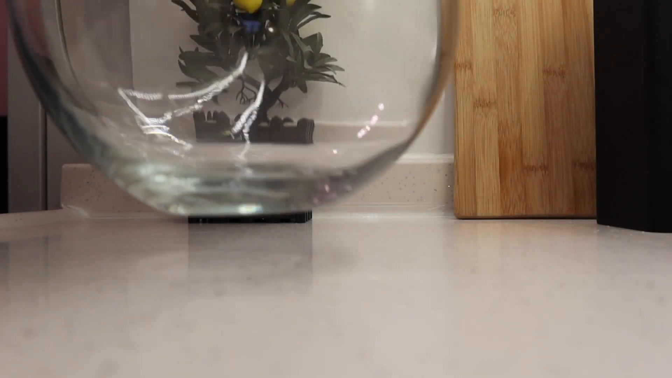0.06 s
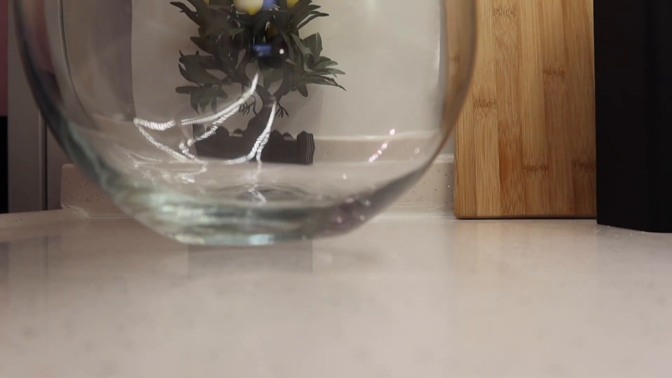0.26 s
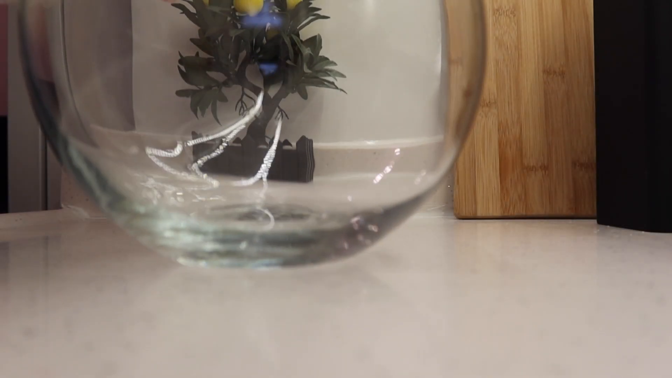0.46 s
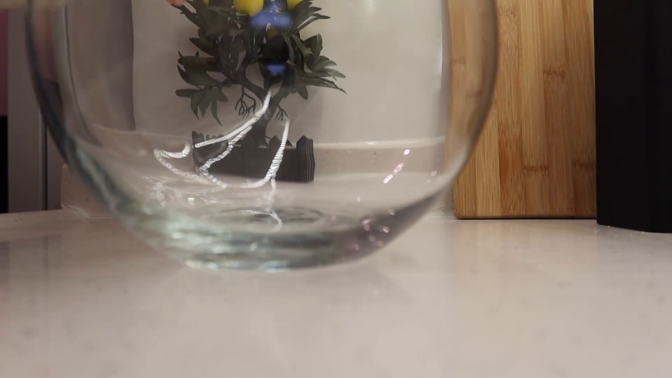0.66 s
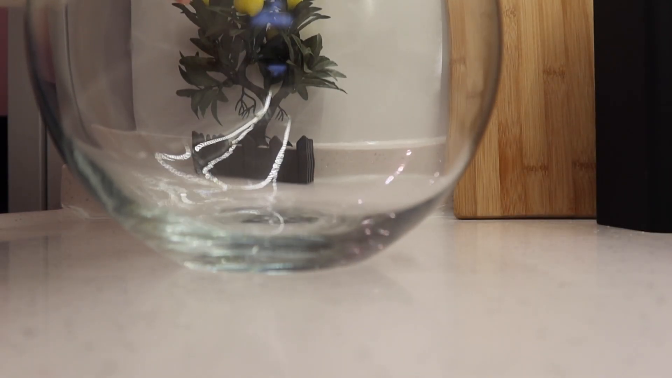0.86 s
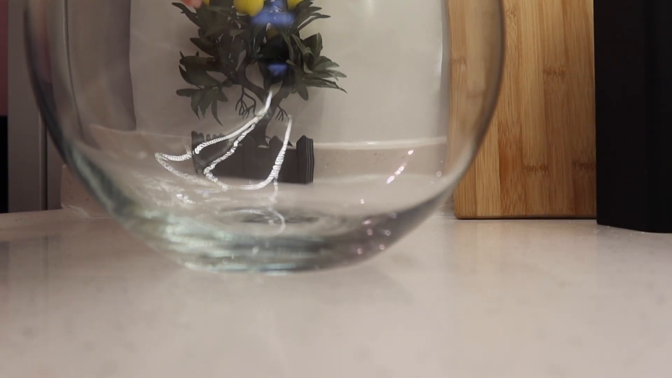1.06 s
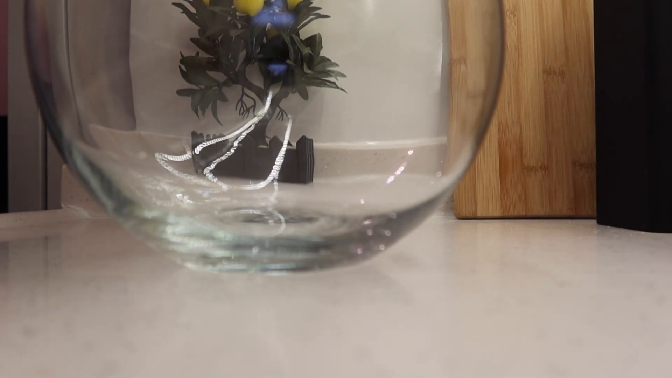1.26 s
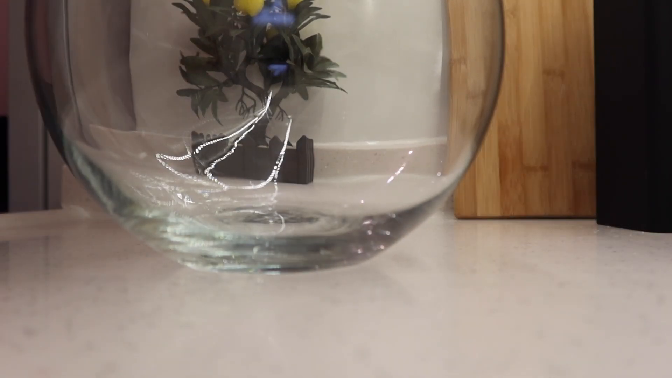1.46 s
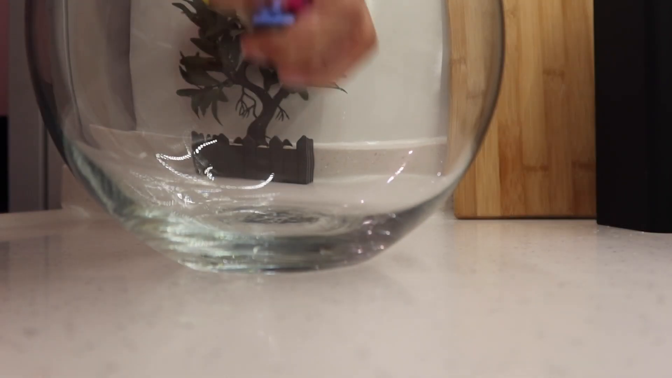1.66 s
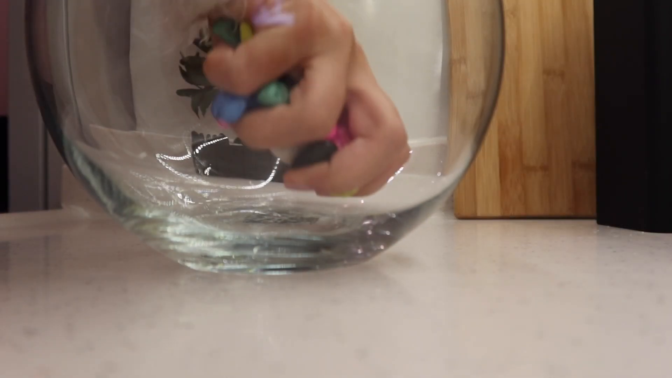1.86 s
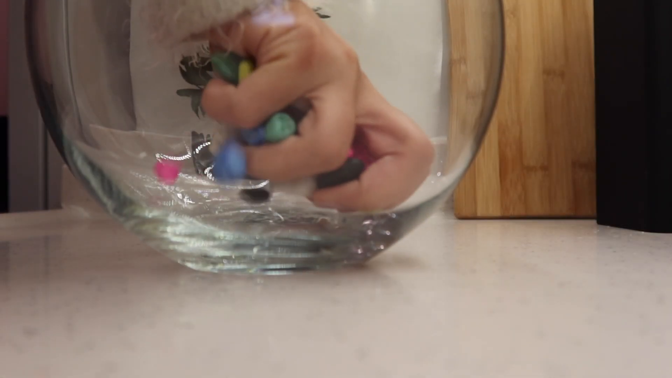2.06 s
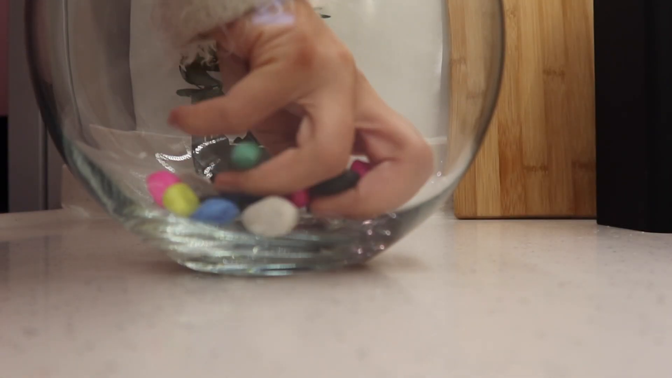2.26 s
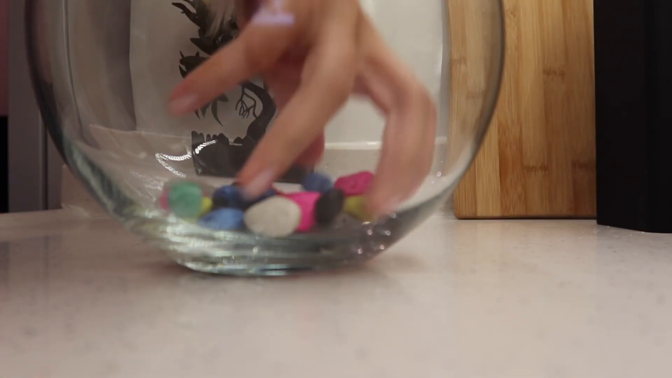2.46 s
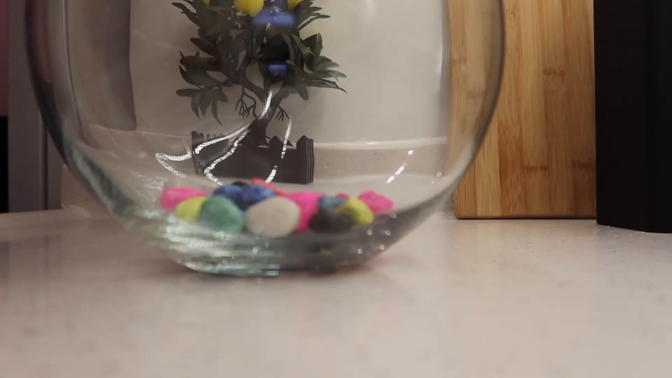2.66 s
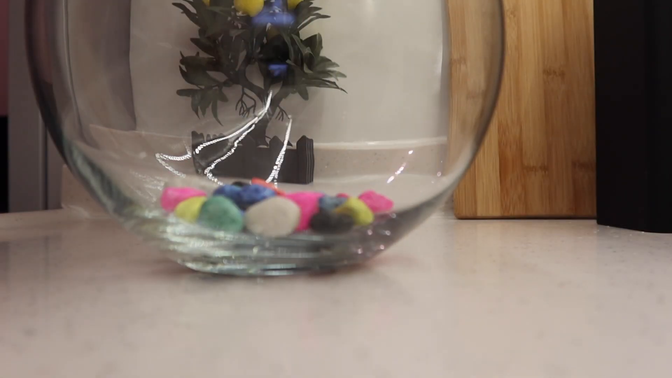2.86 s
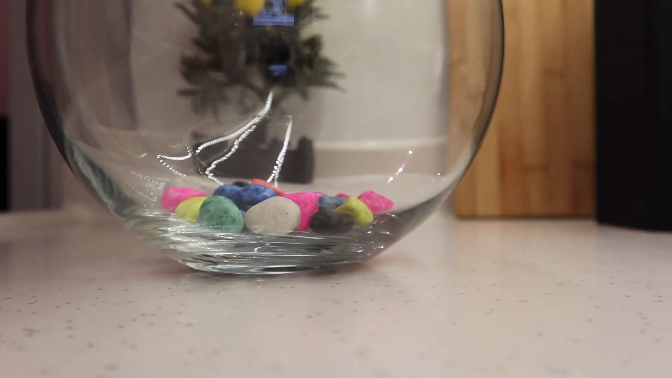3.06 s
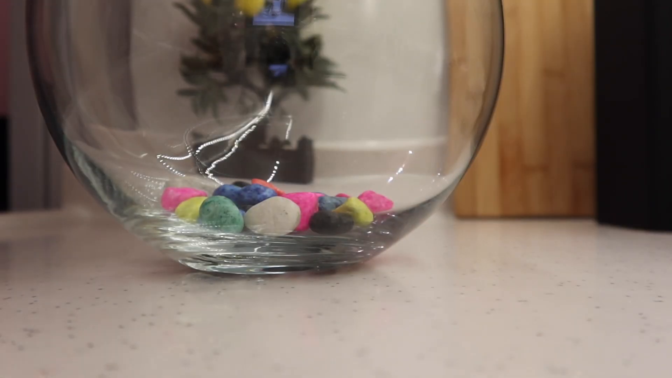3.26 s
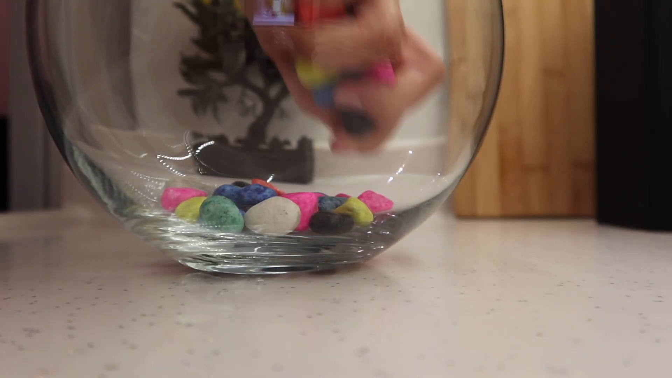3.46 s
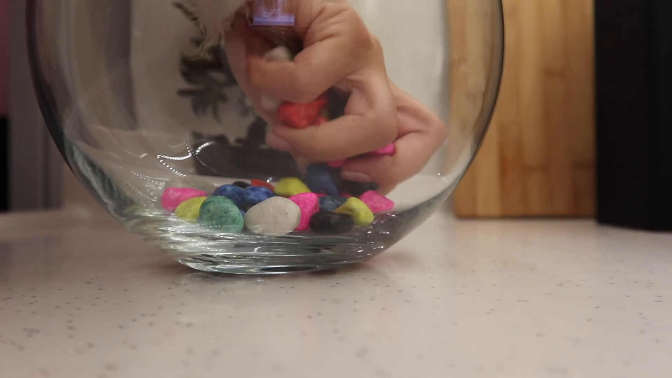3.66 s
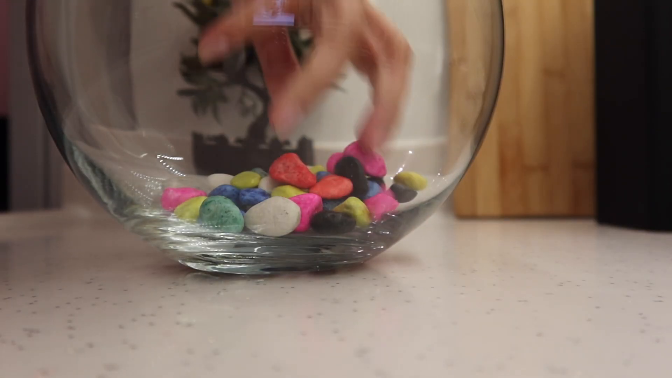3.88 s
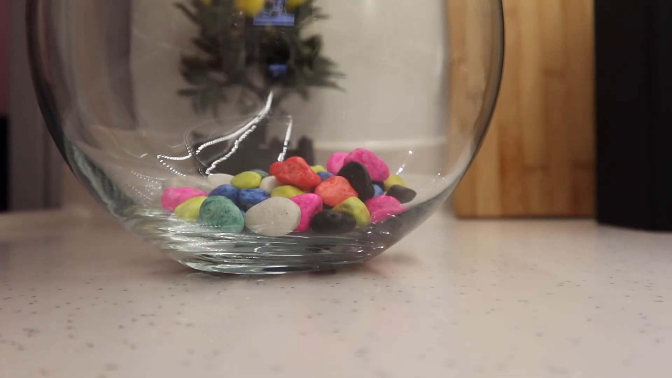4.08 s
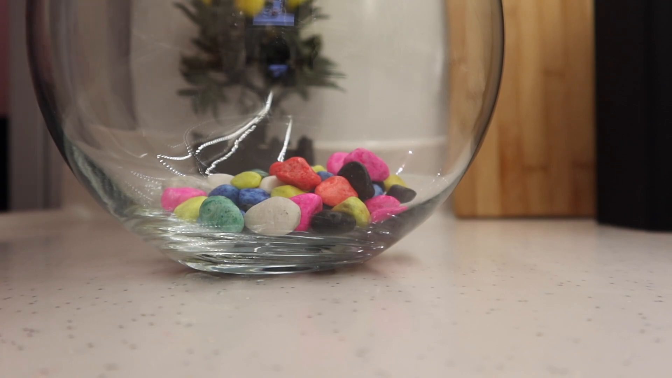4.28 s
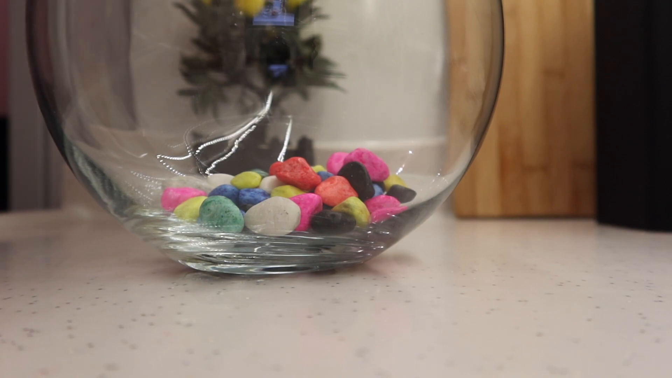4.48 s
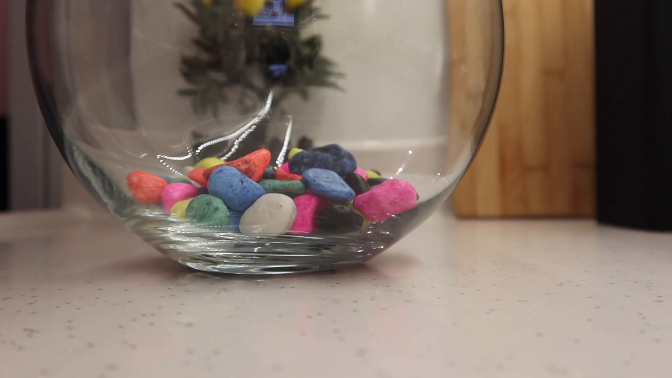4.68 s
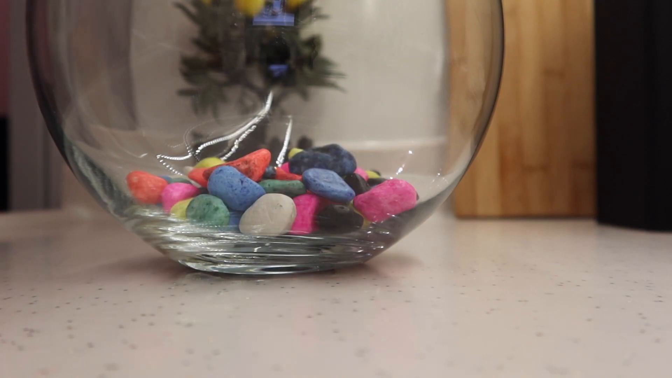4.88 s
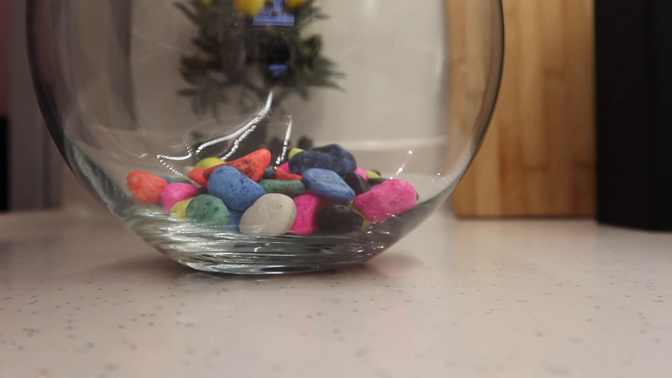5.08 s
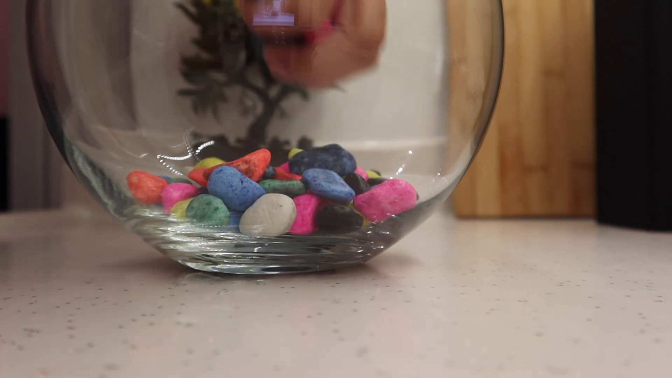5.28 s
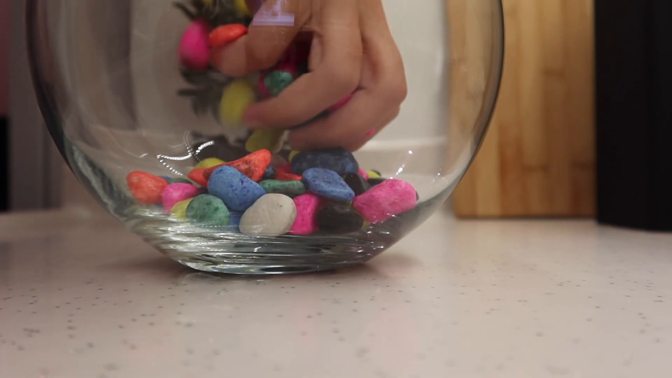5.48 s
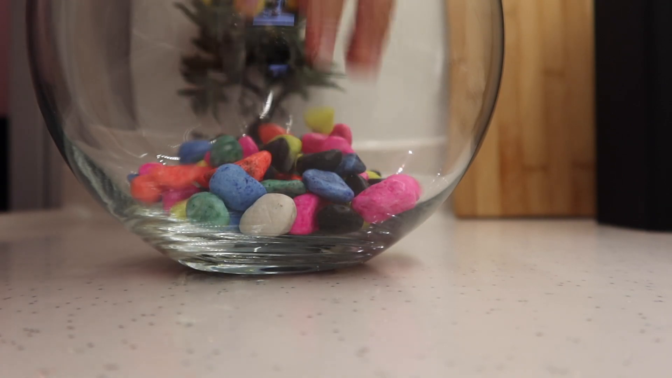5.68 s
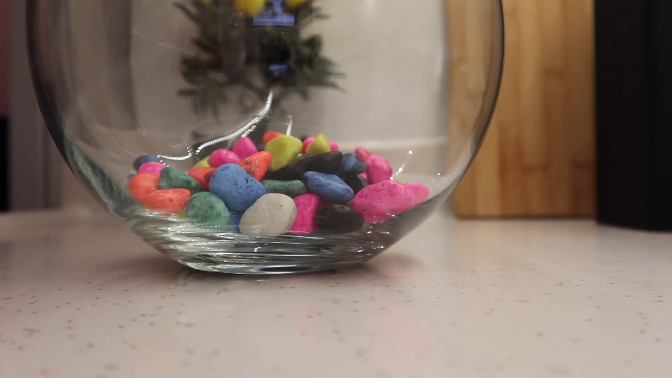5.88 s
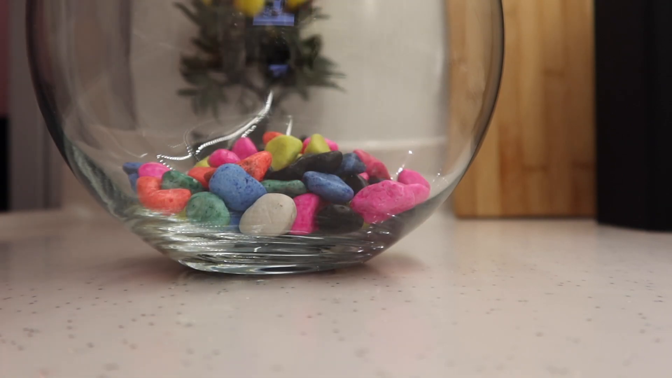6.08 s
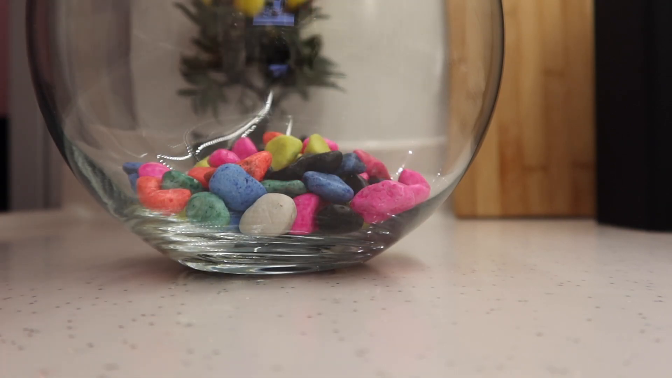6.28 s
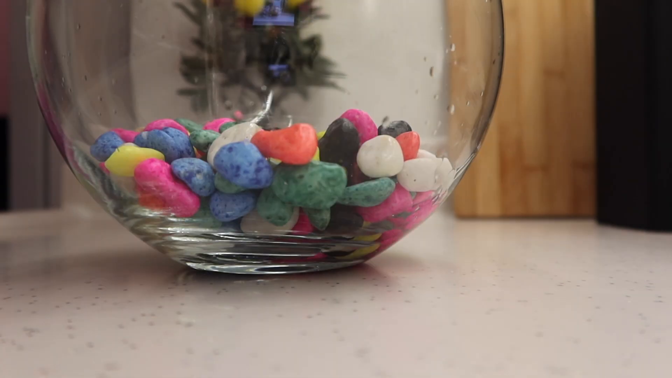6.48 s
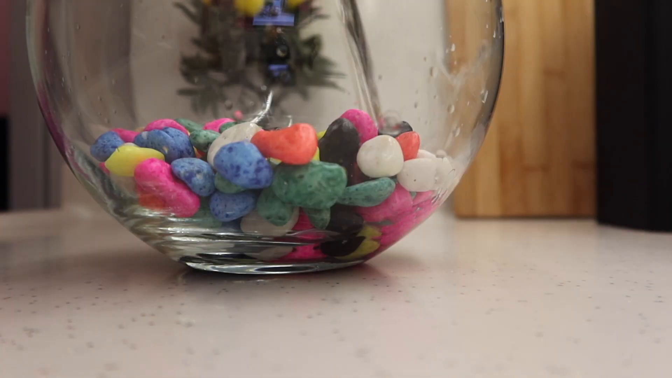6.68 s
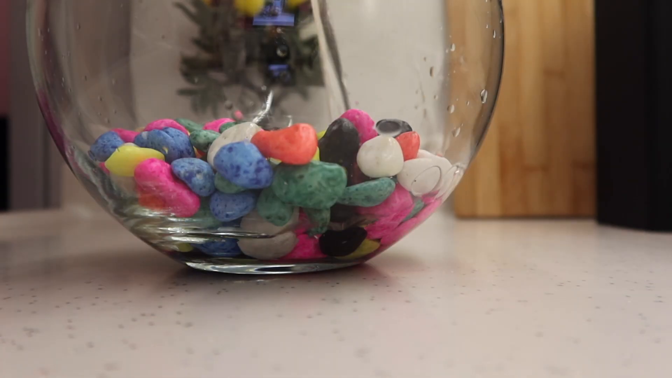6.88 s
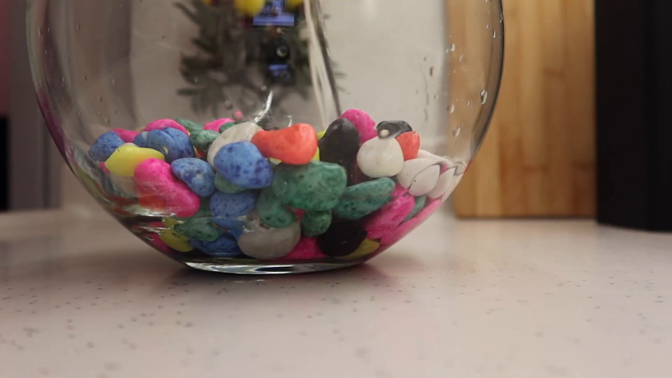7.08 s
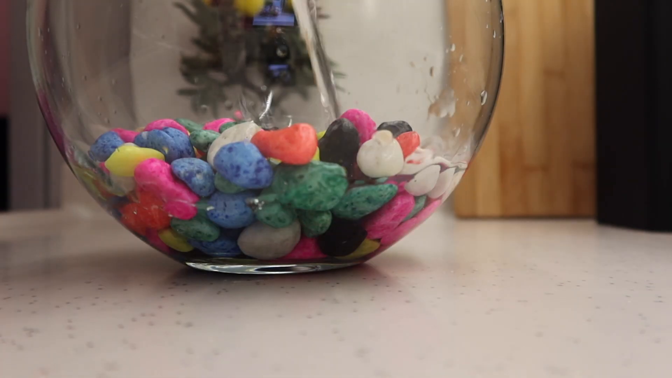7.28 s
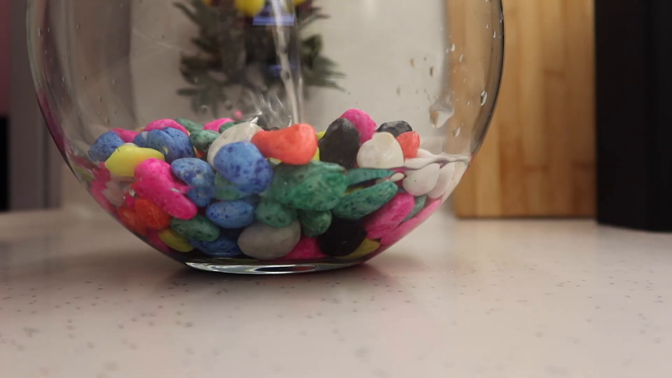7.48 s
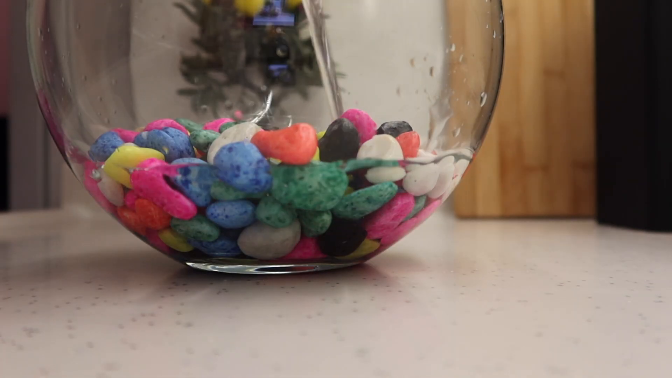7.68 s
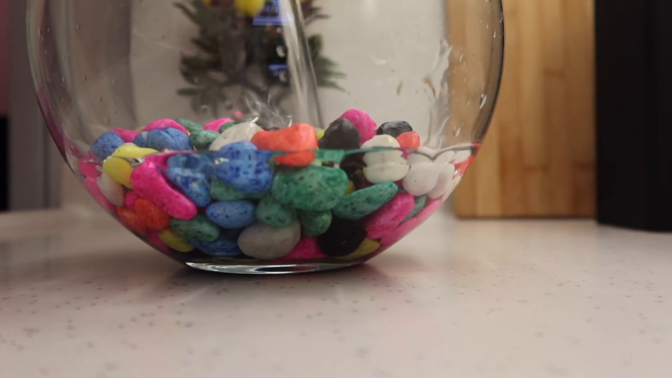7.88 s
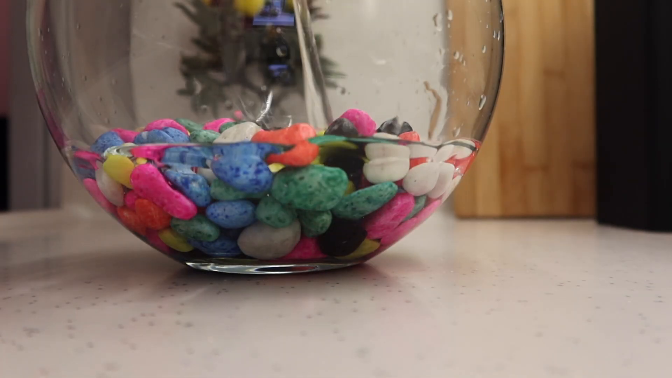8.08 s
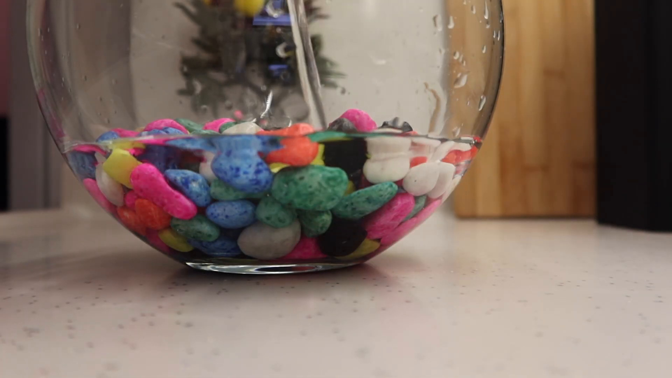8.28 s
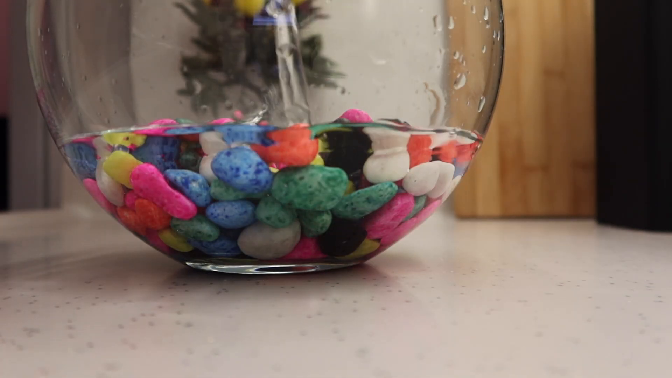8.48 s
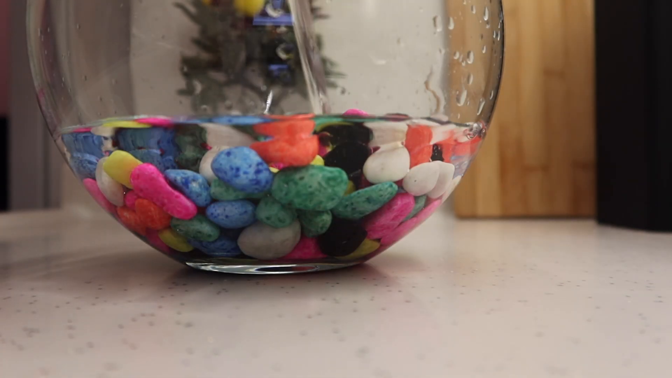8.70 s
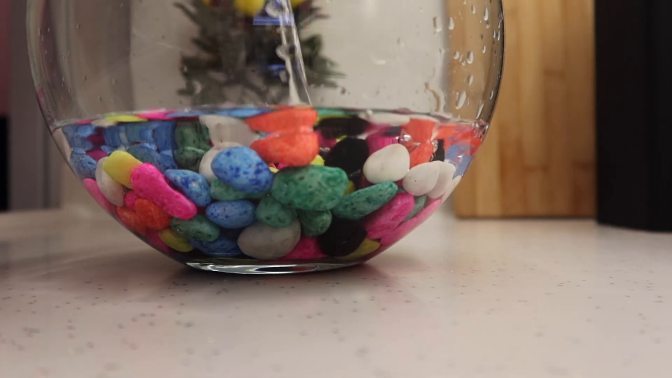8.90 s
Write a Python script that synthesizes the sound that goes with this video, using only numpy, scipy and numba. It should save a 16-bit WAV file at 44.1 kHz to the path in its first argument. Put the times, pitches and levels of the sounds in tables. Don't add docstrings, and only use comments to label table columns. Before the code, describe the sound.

Low appliance hum, then a heavy glass foot knocks twice on the counter and settles. Pebbles drop in three short, loud bursts, each a dense high clinking rattle with gritty scraping and a faint rim ring; the hum sinks beneath them. Finally water gushes over the stones, gurgling and pinging inside the bowl. Close phone microphone, small room, slightly limited peaks.

```python
import sys
import numpy as np
from scipy import signal
from scipy.fft import rfft, irfft
from scipy.io import wavfile
from scipy.ndimage import uniform_filter1d
from numba import njit

SR = 44100
rng = np.random.default_rng(int(sys.argv[2]) if len(sys.argv) > 2 else 0)


def dump(signal):
    limited = np.clip(np.atleast_2d(signal).T, -1, 1)
    pcm = np.round(limited * 32767).astype(np.int16)
    wavfile.write(sys.argv[1], SR, pcm)


def volts_from_db(level):
    exponent = np.asarray(level, float) / 20
    return 10 ** exponent


N = 394254
T = np.arange(N) / SR
DUST = 1e-12 * rng.standard_normal(N)
OPPOSED = np.array([[1], [-1]])

CUTS = [
    3.08,
    4.605,
    6.358,
]
# full from in seconds,
# full to in seconds, ring level in dB, thud in dB re ring, rim level in dB, rim loss in dB per second.
RATTLE = [
    (2.247, 2.49, -24.5, -4.5, 1, 1.5),
    (3.767, 3.917, -33, -0.5, 4, 13),
    (5.576, 5.765, -32, -7.5, 5.5, -7),
]
RATTLE_RISE_DB_PER_S, RATTLE_FALL_DB_PER_S = 171, 149.5
# time in seconds, peak level in dB, pitch in Hz.
DROPS = [(6.3656, -23.5, 2470), (6.3802, -13.5, 5170), (6.4238, -23, 2270), (6.4567, -21.5, 2220),
         (6.496, -26.5, 2150), (6.5532, -34, 2750), (6.583, -34, 2200), (6.6214, -11.5, 2240),
         (6.721, -25, 2100), (6.7394, -17.5, 2110), (6.76, -15, 2170), (6.8217, -24.5, 2760),
         (6.8992, -22, 2760), (6.9193, -19, 3240), (6.956, -20, 4740), (7.0143, -23, 2340),
         (7.0515, -15, 3510), (7.0808, -29, 2420), (7.1222, -23, 2730), (7.1343, -20, 2490),
         (7.16, -20.5, 2470), (7.1943, -20.5, 3520), (7.2522, -21, 2220), (7.2642, -18.5, 4900),
         (7.2828, -14, 4850), (7.3343, -29, 2370), (7.4236, -17.5, 2440), (7.4593, -17.5, 3130),
         (7.5022, -23.5, 3360), (7.5328, -18, 5200), (7.5662, -18.5, 2685), (7.5908, -21.5, 2470),
         (7.6534, -29, 2010), (7.6777, -26.5, 3630), (7.721, -23.5, 4260), (7.756, -23.5, 2000),
         (7.7818, -17.5, 3400), (7.836, -47, 2320), (7.855, -20.5, 4250), (7.9117, -27.5, 2920),
         (7.9501, -16, 4340), (7.9842, -26, 1984), (8.0123, -21, 3330), (8.034, -20, 3560),
         (8.0497, -23, 1980), (8.0823, -14.5, 3330), (8.1927, -18.5, 3600), (8.255, -15.5, 5200),
         (8.3516, -20.5, 3350), (8.4168, -16, 3300), (8.5183, -22.5, 3530), (8.626, -28, 4900),
         (8.6437, -21, 5220), (8.7193, -19, 3450), (8.7948, -35.5, 2530), (8.8736, -44, 2400),
         (8.8949, -19.5, 5200)]
# frequency in Hz, width in Hz, level in dB.
AIR = [(455.3, 21, 0), (1230, 28, 12.5), (1713, 49, 8), (2046, 49, 3.5), (2470, 90, 8.5), (3330, 66, -1.5),
       (3540, 68, 6), (4360, 97, 4), (5130, 41, 1.5), (5390, 160, 2), (6070, 110, 1.5), (6920, 250, -6),
       (7600, 310, -10)]


def level(x, db):
    return x * volts_from_db(db) / np.sqrt(np.mean(x ** 2))


def train(s, size):
    return np.bincount(np.clip(s * SR, 0, N - 1).astype(int), size, N)


def fade(x, t60):
    return signal.lfilter([1], [1, -np.exp(-np.log(1000) / (t60 * SR))], x + 1e-18)


def mode(x, hz, t60):
    r, w = np.exp(-np.log(1000) / (t60 * SR)), 2 * np.pi * hz / SR
    return signal.lfilter([0, r * np.sin(w)], [1, -2 * r * np.cos(w), r * r], x + 1e-18)


def band(x, lo_hz, hi_hz):
    return signal.sosfilt(signal.butter(2, [lo_hz, hi_hz], "band", fs=SR, output="sos"), x + DUST[:x.shape[-1]])


def steep(x, order, hz, side="low"):
    return signal.sosfilt(signal.butter(order, hz, side, fs=SR, output="sos"), x)


def colour(x, table):
    hz, db = np.transpose(table)
    n = 2 ** int(np.ceil(np.log2(N)))
    f = np.arange(n // 2 + 1) * SR / n + 1
    return irfft(rfft(x, n) * volts_from_db(np.interp(np.log(f), np.log(hz), db)), n)[..., :N]


def walk(rate):
    knots = rng.standard_normal(int(N * rate / SR) + 2)
    return 1.55 * np.interp(T * rate, np.arange(len(knots)), knots)


def hold(rows, rise_db, fall_db):
    below = []
    for row in rows:
        below.append(np.maximum(rise_db * (row[0] - T), 0) + np.maximum(fall_db * (T - row[1]), 0))
    below = np.array(below)
    return -below.min(axis=0), below.argmin(axis=0)


@njit
def bank(at, left, right, pole, n):
    out = np.zeros((2, n))
    for m in range(len(pole)):
        a, b, p = 0j, 0j, pole[m]
        life = int(-12 / np.log(abs(p)))
        for k in range(len(at)):
            a, b = a + left[k, m], b + right[k, m]
            until = at[k + 1] if k + 1 < len(at) else n
            for i in range(at[k], min(until, at[k] + life)):
                out[0, i] += a.imag
                out[1, i] += b.imag
                a, b = a * p, b * p
    return out


def strike(s, db, pan_db, hz, gain_db, t60, turn):
    order = np.argsort(s)
    mix = rng.standard_normal((len(s), len(hz)))
    mix *= volts_from_db(gain_db) / np.sqrt(np.mean(mix ** 2, axis=1, keepdims=True))
    phase = np.exp(1j * turn * rng.standard_normal(len(hz)))
    left = mix * volts_from_db(db + pan_db / 2)[:, None] * phase
    right = mix * volts_from_db(db - pan_db / 2)[:, None] / phase
    pole = np.exp((2j * np.pi * hz - np.log(1000) / t60) / SR)
    return bank((s[order] * SR).astype(np.int64), left[order], right[order], pole, N)


def ducking(x, top_db, release_s, depth):
    fall = np.exp(-1 / (release_s * SR))
    parts = np.split(np.mean(x ** 2, axis=0), (np.array(CUTS) * SR).astype(int))
    power = np.concatenate([signal.lfilter([1 - fall], [1, -fall], p) for p in parts])
    return (1 + power / volts_from_db(top_db) ** 2) ** -depth


def hum():
    # frequency in Hz, level in dB per Hz.
    spectrum = [(12, -33), (20, -7), (70, 0.5), (122, -0.5), (266, -6), (427, -7), (549, -9), (614, -10),
                (1160, -14.5), (1300, -11.5), (1580, -16), (2540, -17), (6250, -25), (8300, -31.5),
                (10000, -34.5), (14600, -38), (15500, -38)]
    # time in seconds, level in dB.
    swell = [
        (0, -53.5),
        (1.9, -51.5),
        (3.07, -58),
        (3.09, -51.5),
        (4.6, -53),
        (5.4, -52.5),
        (8.94, -48),
    ]
    mid, side = colour(rng.standard_normal((2, N)), spectrum)
    both = band(mid, 33, 15000) + 0.78 * band(side, 160, 16000) * OPPOSED
    wander = .6 * walk(9)
    return level(both, 0) * volts_from_db(np.interp(T, *np.transpose(swell)) + wander)


def counter():
    # time in seconds, ring level in dB, contact time in ms,
    # room level in dB, favoured frequency in Hz where the foot lands.
    knocks = [
        (.537, -3.5, 0.21, -3.5, 865),
        (.852, -9, 1.22, -22.5, 478),
        (0.896, -2, 1.23, -49, 470),
        (1.478, -23, 1.15, -47, 325),
        (1.521, -28, 1.15, -47.5, 322),
        (1.958, -24.5, 1.6, -39, 297),
        (3.784, -11, 3.4, -35, 150),
    ]
    # frequency in Hz, level in dB, t60 in seconds.
    slab = [(75.7, -13, 0.14), (131.6, -9.5, 1), (201, 1, 0.33), (319.3, 4.5, 0.16), (366, 9.5, 0.058),
            (462, 6, 0.2), (513, 5, 0.053), (617, 13, 0.025), (800, 6, 0.056), (1135, 12, 0.038),
            (1390, 16.5, 0.037), (2000, 4, 0.023), (2940, 5, 0.012)]
    # time in seconds, level in dB, t60 in seconds.
    scrapes = [
        (.537, 11.5, 0.0083),
        (0.85, -26.5, 0.014),
        (.896, -29.5, 0.029),
        (1.476, -37, 0.54),
        (4.569, -32.5, 0.12),
    ]
    # time in seconds, level in dB, t60 in seconds.
    cracks = [
        (0.539, -15, 0.0054),
        (.545, -42, .05),
        (4.566, -54.5, .1),
        (4.584, -57, .06),
    ]
    soft_hz_ms = 2630
    favour_db_per_octave = 6.5
    s, ring_db, contact_ms, room_db, favour_hz = np.transpose(knocks)
    ring, scrape, crack = np.zeros((3, N))
    for k in range(len(s)):
        after = slice(int(s[k] * SR), int((s[k] + .4) * SR))
        t = T[after] - T[after.start]
        u = np.clip(t * 1000 / contact_ms[k], 0, 1)
        push = volts_from_db(ring_db[k] - 46.5) * np.sin(np.pi * u) ** 2 / contact_ms[k]
        push = steep(push, 4, min(soft_hz_ms / contact_ms[k], SR / 3))
        ring[after] += volts_from_db(29) * contact_ms[k] ** 3 * push
        for m, (f, d, t60) in enumerate(slab):
            off_db = favour_db_per_octave * abs(np.log2(f / favour_hz[k]))
            ring[after] += (-1) ** m * volts_from_db(d - off_db) * mode(push, f, t60)
    for start, db, t60 in scrapes:
        scrape += fade(train(np.array([start]), [volts_from_db(db)]), t60)
    for start, db, t60 in cracks:
        crack += fade(train(np.array([start]), [volts_from_db(db)]), t60)
    rasp = rng.standard_normal(N)
    crack = band(crack * rasp, 3000, 13000)
    scrape = band(band(band(scrape * rasp, 340, 3000), 300, 2900), 200, 3000)
    send = band(band(train(s, volts_from_db(room_db - 3.0)), 40, 2500), 30, 2600)
    return band(ring, 46, 9000) + rocking() + crack + scrape, send


def room(x):
    # centre in Hz, t60 in seconds, level in dB.
    octaves = [(74, 0.64, -9.5), (124, 1., 4), (234.4, 0.46, 11.5), (515, 0.49, 12), (1049, 0.64, 0.5),
               (1670, 0.4, 1), (2600, 0.4, -3), (7000, 0.18, -40.5)]
    t = T[:SR]
    noise = rng.standard_normal((3, SR))
    tail = 0
    for f, t60, d in octaves:
        spread = noise[0] + min(f / 900, .4) * noise[1:]
        tail = tail + volts_from_db(d - 60 * t / t60) * band(spread, f / 2.38, f * 1.355)
    swell = 1 - .85 * np.exp(-(t / .07) ** 2)
    return signal.oaconvolve(x[None], tail * swell, axes=1)[:, :N]


def rocking():
    # tap time in seconds, peak level in dB.
    taps = [(1.1, -28), (1.162, -32), (1.216, -32.5), (1.277, -34), (1.323, -33.5), (3.959, -23),
            (3.995, -18), (4.037, -22.5), (4.068, -22), (4.105, -24), (4.141, -24), (4.171, -28),
            (4.206, -26), (4.237, -28.5), (4.269, -25.5), (4.297, -30), (4.328, -25.5), (4.36, -28.5),
            (4.383, -29), (4.409, -26.5), (4.439, -29), (4.457, -28.5), (4.49, -33), (4.508, -30.5),
            (4.529, -31), (4.551, -25.5)]
    # frequency in Hz, level in dB, t60 in seconds.
    tap_modes = [(208, 0, 0.14), (250.2, -3, 0.14), (299, -3, 0.084), (443.6, 6.5, 0.15), (89.8, -5, 0.075),
                 (127, -8, 0.12), (513, 8.5, 0.12)]
    # time in seconds, length in seconds, pitch in Hz, level in dB.
    squeaks = [
        (0.597, 0.054, 6850, -66),
        (1.114, 0.036, 2874, -62.5),
        (1.11, 0.035, 4400, -71),
    ]
    s, db = np.transpose(taps)
    mix_db = 4.0 * rng.standard_normal((len(s), len(tap_modes)))
    rock = np.zeros(N)
    for m, (f, d, t60) in enumerate(tap_modes):
        tap = uniform_filter1d(train(s, volts_from_db(db + d - 8.5 + mix_db[:, m])), size=90)
        rock += (-1) ** m * mode(tap, f, t60)
    bright = train(s[::2], volts_from_db(db[::2] - 26.0))
    rock = rock + mode(bright, 1407, 0.037) - mode(bright, 1150, 0.042) + mode(bright, 720, 0.056)
    squeak = np.zeros(N)
    for t, length, f, d in squeaks:
        squeak += volts_from_db(d + 3.4 * walk(60)) * np.exp(-((T - t) / length) ** 2) * np.sin(2 * np.pi * f * T)
    return band(rock, 70, 3000) + squeak


def landings():
    # time in seconds, peak level in dB, thud in dB re peak.
    first = [(2.0009, -1, -8.5), (2.1246, 0.5, -11), (2.1555, -1.5, -13), (2.177, -0.5, -12),
             (2.2179, -4.5, -12), (2.2454, -5.5, -13), (2.2692, -7.5, -12.5), (2.3444, -16, -29.5),
             (2.3882, -13.5, -18.5), (2.4124, -14, -20), (2.4214, -12, -30), (2.4271, -8, -16),
             (2.4334, -7.5, -11.5), (2.4678, -11, -28), (2.4992, -19, -20.5), (2.5137, -4.5, -12),
             (2.5531, -3.5, -10.5), (2.5905, -8.5, -11.5), (2.6044, -6, -12.5), (2.6454, -8.5, -16),
             (2.6802, -18, -17)]
    second = [(3.5855, -3.5, -13), (3.5883, 2.5, -13), (3.6224, -2.5, -22), (3.6526, -14, -17.5),
              (3.6666, -9.5, -21), (3.7133, -8.5, -6), (3.7714, -4, -10), (3.7753, -1, -14),
              (3.7852, -1, -11.5), (3.7789, 0, -15.5), (3.8131, -11, -26), (3.832, -6, -26),
              (3.8482, -6, -22.5), (3.8883, -6, -17), (3.9136, -10, -27.5), (3.936, -12.5, -22),
              (3.9494, -7.5, -17), (4.004, -12, -12), (4.0368, -21, -24.5)]
    third = [(5.4039, -23, -8.5), (5.4118, -17, 5), (5.415, -13, 1), (5.424, -15, 1), (5.4536, 6.5, -11),
             (5.513, -10, -1.5), (5.5485, 1, -6.5), (5.582, 6, -13.5), (5.6079, -3, -4.5), (5.6161, 6, -20),
             (5.641, -14, -5), (5.6843, -10, -8), (5.6895, -5, -11.5), (5.695, -10, -4),
             (5.7085, 3.5, -23.5), (5.7436, -1, -23), (5.7634, -6, -24.5), (5.7802, -11, -29),
             (5.8106, -7, -28), (5.834, -7.5, -12.5), (5.8468, 3, -17.5), (5.8982, 0, -22),
             (5.9479, -2.5, -18), (5.9631, -12, -14.5), (5.9912, -10, -11.5), (6.0157, -10, -11),
             (6.101, -23, -8), (6.115, -17, -14.5)]
    faint_leads = [
        (1.986, -30, -25),
        (1.9965, -22, -20),
        (3.5765, -22.5, -7),
    ]
    # full from in seconds, full to in seconds,
    # ring level in dB, thud in dB re ring.
    trickles = [
        (2.03, 2.12, -50, 11.5),
        (2.138, 2.622, -28.5, -8),
        (3.601, 3.759, -30.5, -3),
        (3.8, 3.979, -30, -11.5),
        (5.43, 5.7, -32, -2),
        (5.72, 5.957, -25.5, -16),
    ]
    stone_db, stone_thud_db = -3, 4
    chatter_s, weak_chatter_s_per_db = .006, .0005
    s, db, thud_db = np.repeat(np.transpose(first + second + third + faint_leads), repeats=4, axis=1)
    late = rng.random(len(s)) * (np.arange(len(s)) % 4 > 0)
    s = s + (chatter_s + weak_chatter_s_per_db * np.clip(-db, 0, 12)) * late
    db = db + stone_db - 6 * late
    slide_db, handful = hold(RATTLE, RATTLE_RISE_DB_PER_S, RATTLE_FALL_DB_PER_S)
    small = np.flatnonzero(rng.random(N) < 600 / SR)
    small = small[slide_db[small] > -40]
    slide = np.array(RATTLE)[handful[small]]
    s = np.r_[s, small / SR]
    db = np.r_[db, slide_db[small] + slide[:, 2] + 1.5 * rng.exponential(size=len(small))]
    thud_db = np.r_[thud_db + stone_thud_db, slide[:, 3]]
    for start, stop, ring_db, low_db in trickles:
        when, size = rng.random((2, 120))
        s = np.r_[s, start + (stop - start) * when]
        db = np.r_[db, ring_db - 3 * np.log(size + .01)]
        thud_db = np.r_[thud_db, low_db + 0 * size]
    return s, db, thud_db


def glass_wall(s, db, pan_db):
    # frequency in Hz, spread in Hz, level in dB,
    # longest t60 in seconds, loss in dB per second as the heap grows.
    groups = [(5800, 77, -1.5, 0.22, 6.5), (6280, 140, -2, 0.22, 2), (7892, 140, 2.5, 0.18, 2),
              (8890, 120, 0, 0.11, 1), (9500, 130, -5, 0.048, 2.5), (9700, 470, -4, 0.19, 2),
              (9770, 150, -6.5, 0.1, 1.5), (10290, 120, -5.5, 0.083, 0), (10900, 220, -8.5, 0.11, 1),
              (11800, 150, -8, 0.11, 4), (11560, 120, -14, 0.18, 2), (11900, 220, -11.5, .12, 1.5),
              (12160, 180, -5, 0.13, 1), (12200, 340, -10.5, 0.089, 3.5), (13250, 120, -6, 0.12, 1.5),
              (13200, 120, -15.5, .12, 0.077), (13600, 110, -16.5, .12, 0),
                   (13500, 51, -17, 0.1, 0.24), (13900, 380, -15.5, 0.12, 0),
                   (14700, 180, -23, .08, -1.007), (15380, 120, -25.5, .08, -1)]
    stiffen_per_s = 0.0031
    hz, spread, gain_db, t60, loss_db = np.repeat(np.transpose(groups), repeats=5, axis=1)
    count = len(hz) // 5
    short = np.tile([0.35, 1.0, 0.9, 0.22, 0.12], count)
    gain_db = gain_db - 26.0 - 17 * np.log10(short) - loss_db * (s[:, None] - 2)
    place = np.tile([0.084, 0.31, -0.24, 0.398, -0.36], count)
    hz = hz + spread * (place + 0.13 * rng.standard_normal(len(hz)))
    turn = np.interp(hz, [6000, 8000, 12000], [1.1, .6, .8])
    load = np.searchsorted(CUTS, s)
    ring = np.zeros((2, N))
    for k, row in enumerate(RATTLE):
        on = load == k
        stiff_hz = hz * (1 + stiffen_per_s * (row[0] - 3))
        ring += strike(s[on], db[on], pan_db[on], stiff_hz, gain_db[on], t60 * short, turn)
    return volts_from_db(2) * (volts_from_db(-12) * ring + 0.69 * steep(ring, 4, 5300, "high"))


def stone_grit(s, db, thud_db):
    lead_db, lead_t60_s = -37, .03
    noise = rng.standard_normal((3, N))
    blows = train(s, volts_from_db(db))
    rub = volts_from_db(-38.0) * fade(blows, 0.083) + volts_from_db(lead_db) * fade(blows[::-1], lead_t60_s)[::-1]
    low = band(band(noise[0] + 0.31 * noise[1:], 1200, 3300), 1400, 3500)
    middle = band(band(noise[1] * OPPOSED + 0.85 * noise[0], 3200, 5400), 3400, 5500)
    high = band(noise[0] + 0.65 * noise[1:], 4700, 14000)
    grit = rub * (low + volts_from_db(-1.5) * high + volts_from_db(-12) * middle)
    dense = band(band(noise[0] + 0.72 * noise[1:], 8700, 14000), 8800, 14100)
    grit = grit + volts_from_db(-26.5 - 1.2 * (T - 8.0)) * fade(blows, 0.048) * dense
    on_stone = fade(train(s, volts_from_db(db + thud_db)), .05)
    return grit + volts_from_db(-36.5) * on_stone * band(noise[0] + .4 * noise[1:], 2000, 5600)


def base_thud(s, db, thud_db, pan_db):
    # frequency in Hz, width in Hz, level in dB.
    base = [(126.6, 9.3, -2), (223.8, 13, 0), (339, 42, 3), (563, 300, 9), (744, 44, 6.5), (883, 50, -1),
            (1354, 340, 13.5), (1603, 92, 5), (1924, 63, 2.5), (2650, 90, -2.5), (2930, 460, -8.5)]
    hz, width, gain_db = np.transpose(base)
    gain_db = gain_db - 27.5 + 10 * np.log10(width / 60)
    thud = strike(s, db + thud_db, pan_db / 3, hz, gain_db, 4.46 / width, 0.081)
    tick = band(train(s, volts_from_db(db + thud_db + 12.5) * rng.standard_normal(len(s))), 180, 2800)
    return tick + thud


def rim_ring():
    # frequency in Hz, level in dB, t60 in seconds.
    rim_modes = [(591, -32, 1.65), (1635, -40.5, 0.9), (1376, -55, 0.208)]
    touched_s, touch_db_per_s = 5.97, -150
    heap = np.transpose(RATTLE)
    handful = hold(RATTLE, RATTLE_RISE_DB_PER_S, RATTLE_FALL_DB_PER_S)[1]
    blows = train(heap[1], volts_from_db(heap[4]))
    rim = [volts_from_db(d) * mode(blows, f, t60) for f, d, t60 in rim_modes]
    touch_db = touch_db_per_s * np.clip(T - touched_s, 0, 1)
    loss_db = heap[5][handful] * np.clip(T - heap[1][handful], 0, 1)
    return volts_from_db(touch_db - loss_db) * rim[0] + sum(rim[1:])


def stones():
    s, db, thud_db = landings()
    pan_db = 2 * rng.standard_normal(len(s))
    glass = steep(glass_wall(s, db, pan_db) + stone_grit(s, db, thud_db), 8, 14500)
    return glass, base_thud(s, db, thud_db, pan_db), rim_ring()


@njit
def bubbles(at, hz, cycles, size, pan, glide, n):
    out = np.zeros((2, n))
    for k in range(len(at)):
        length = int(cycles[k] * SR / hz[k])
        z, p = size[k] + 0j, np.exp(2j * np.pi * hz[k] / SR - 5 / length)
        bend = np.exp(4j * np.pi * glide * hz[k] / SR / length)
        for i in range(min(length, n - at[k])):
            v = z.imag * min(6 * i / length, 1.)
            out[0, at[k] + i] += v * pan[k]
            out[1, at[k] + i] += v / pan[k]
            z, p = z * p, p * bend
    return out


def bubble_cloud():
    at = np.flatnonzero((rng.random(N) < 10000 / SR) & (T > CUTS[-1]))
    chance = rng.random((len(at), 4)).T
    hz = 250 * 32 ** chance[0]
    cycles = (10 + 40 * chance[2]) * np.sqrt(hz / 2000)
    size = volts_from_db(-1.8 * np.log(chance[1] + .01))
    return bubbles(at, hz, cycles, size, volts_from_db(0.28 * (chance[3] + 0.5)), 0.018, N)


def splash(cloud):
    # frequency in Hz, level in dB per Hz.
    spectrum = [(88, -61.5), (150, 8), (300, -14.5), (378, -25), (450, -3.5), (700, -7.5), (850, -21),
                (1230, -40), (1510, -8), (2250, 7.5), (2850, 3.5), (3470, 10), (3820, 3.5), (5000, 6.5),
                (12600, -32.5), (13600, -32), (15000, -97)]
    wash = colour(cloud, spectrum)
    clusters = sum(band(wash, f / 1.2, f * 1.2) * volts_from_db(1.5 * walk(17)) for f in 330 * 1.45 ** np.arange(10))
    return level(clusters, -5.5)


def air_ring(cloud):
    fill_db_per_octave_s = 4.5
    air = 0
    for f, w, d in AIR[1:]:
        fill_db = fill_db_per_octave_s * (T - 7.6) * np.log2(f / 2600)
        air = air + volts_from_db(d + 2.5 * walk(30) + fill_db) * level(mode(cloud[0], f, 6.9 / w), 0) * np.sqrt(w / 90)
    return level(air, -10.0)


def spray_hiss(fine):
    # centre in Hz, level in dB.
    spray_bands = [(3890, 0), (4950, 0), (6100, -2), (7500, -1), (9000, 1), (10600, 1), (12400, -5)]
    mist = level(band(band(fine[0] + 2.0 * fine[1:], 3600, 14000), 3300, 16000), 4.7)
    hiss = 0
    for f, d in spray_bands:
        hiss = hiss + band(mist, f / 1.146, f * 1.05) * volts_from_db(d + 0.97 * walk(8.9) + 2.0 * walk(45))
    return signal.sosfilt(signal.ellip(6, 1, 40, 13500, fs=SR, output="sos"), hiss)


def loud_drops(fine):
    s, db, hz = np.transpose(DROPS)
    hits = train(s, volts_from_db(db))
    slap = fade(hits, 0.014) * rng.standard_normal(N)
    burst = band(fade(hits, 0.036) * (fine[0] + fine[1:]), 6500, 11500)
    fizz = band(band(fade(hits, .06) * fine[1:], 13600, 15000), 13500, 15100)
    ping = band(sum(volts_from_db(d) * mode(slap, f, 5.4 / w) for f, w, d in AIR[3:]), 1040, 7400)
    out = volts_from_db(-6) * band(slap, 3200, 6500) + volts_from_db(-24.5) * burst + volts_from_db(-40) * fizz + volts_from_db(-42) * ping
    s, db, hz = np.repeat(np.transpose(DROPS), repeats=4, axis=1)
    chance = rng.random((len(s), 3)).T
    at = ((s + .012 * chance[0] ** 2) * SR).astype(np.int64)
    hz = hz * (.96 + 0.089 * chance[1] ** 3)
    return out + bubbles(at, hz, 24 + 40 * chance[2], volts_from_db(db - 6.5), np.ones(len(s)), 0.008, N)


def water():
    # time in seconds, splash level in dB.
    stream = [
        (6.62, -41.5),
        (6.9, -41.5),
        (7.35, -40.5),
        (7.7, -38),
        (8.1, -39),
        (8.45, -39),
        (8.65, -47),
        (8.94, -45.5),
    ]
    # time in seconds, splash level in dB.
    gushes = [
        (6.358, -43.5),
        (6.375, -40),
        (6.615, -34.5),
        (6.76, -47),
        (7.26, -41),
        (7.423, -34),
        (8.08, -39.5),
        (8.41, -39.5),
        (8.71, -44.5),
    ]
    # time in seconds, level in dB.
    mouth_db = [
        (6.36, -44),
        (6.62, -80),
        (6.88, -33.5),
        (7.28, -39.5),
        (7.5, -40.5),
        (7.9, -40.5),
        (8.08, -32.5),
        (8.5, -41),
        (8.94, -44),
    ]
    gush_rise_s, gush_t60_s = 0.0022, 0.72
    start, db = np.transpose(gushes)
    gush = fade(train(start + gush_rise_s / 2, volts_from_db(db)), gush_t60_s)
    gush = uniform_filter1d(gush, int(gush_rise_s * SR))
    flow = np.hypot(gush, volts_from_db(np.interp(T, *np.transpose(stream))) * (T > stream[0][0]))
    gulps_db = 0.5 * walk(11)
    tone = volts_from_db(np.interp(T, *np.transpose(mouth_db)) - 8.5 + gulps_db) * (T > start[0])
    spray_db = -8 + 3 * (T - start[0]) + 1.1 * walk(42)
    cloud = bubble_cloud()
    broad = splash(cloud)
    mouth_hz, mouth_width = AIR[0][:2]
    mouth = level(band(mode(cloud[0] * volts_from_db(walk(25)), mouth_hz, 4.9 / mouth_width), 298, 540), 0)
    fine = (rng.random((3, N)) < 9000 / SR) * volts_from_db(1.2 * rng.exponential(size=(3, N)))
    fine = fine * rng.standard_normal((3, N))
    bass = np.roll(broad[0] + tone / (flow + 1e-6) * mouth, shift=300)
    wide = volts_from_db(-25) * band(bass, 120, 1000) * OPPOSED
    pour = broad + wide + air_ring(cloud) + volts_from_db(spray_db) * spray_hiss(fine)
    return flow * volts_from_db(0.71 * walk(18)) * pour + tone * mouth + loud_drops(fine)


def scene():
    knock, send = counter()
    glass, thud, rim = stones()
    body = knock + thud[0]
    across = volts_from_db(-19) * band(np.roll(body, shift=40), 250, 800)
    across = across + volts_from_db(-30) * band(np.roll(body, shift=11), 600, 2800)
    near = knock + glass + thud + across * OPPOSED
    near = near * ducking(near, -20.5, 0.055, 0.2) * volts_from_db(3.5)
    near = near + rim * ducking(near, -32.5, 0.09, 0.17)
    far = room(send + volts_from_db(-37) * thud[0] + volts_from_db(-29.5) * glass[0])
    for cut in CUTS:
        after = (T >= cut) & (T < cut + .4)
        near[:, after], far[:, after] = 0, 0
    return near + far + hum() * ducking(near, -21.0, 0.81, 0.88) + water()


def top_cut(x):
    return signal.sosfilt(signal.butter(12, 15640, fs=SR, output="sos"), x)


def record(dry):
    top = signal.ellip(8, .3, 50, 15600, fs=SR, output="sos")
    rounded = np.tanh(1.157 * dry) / np.tanh(1.1)
    return top_cut(signal.sosfilt(top, rounded))


dry = scene()
out = record(dry)
dump(out)
```